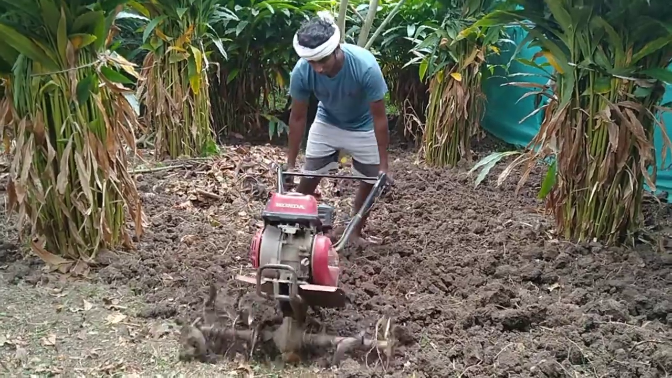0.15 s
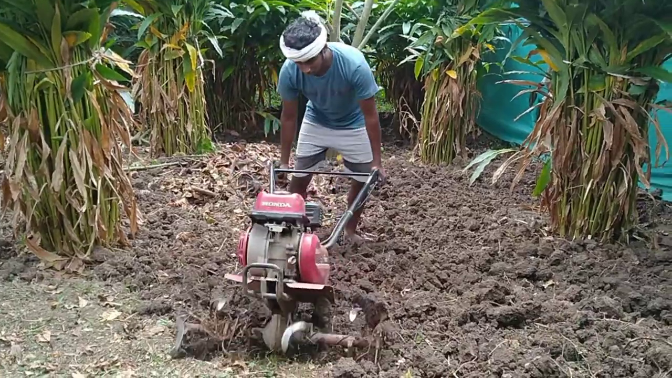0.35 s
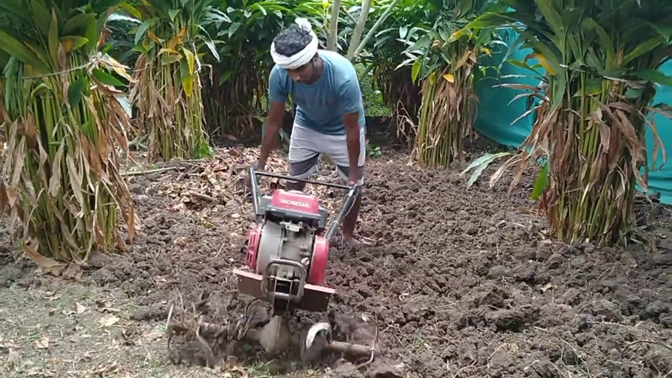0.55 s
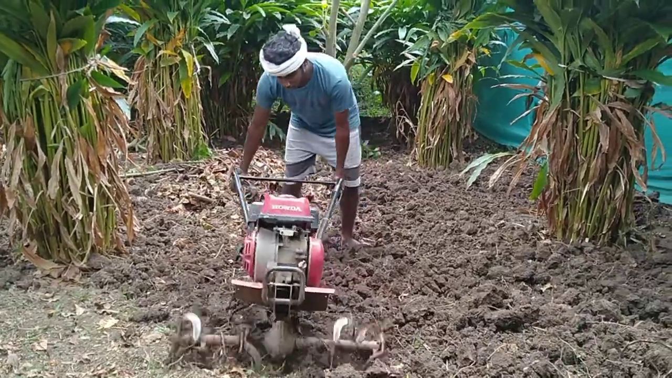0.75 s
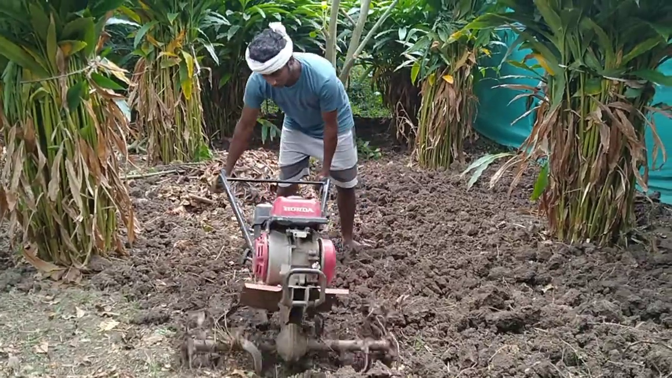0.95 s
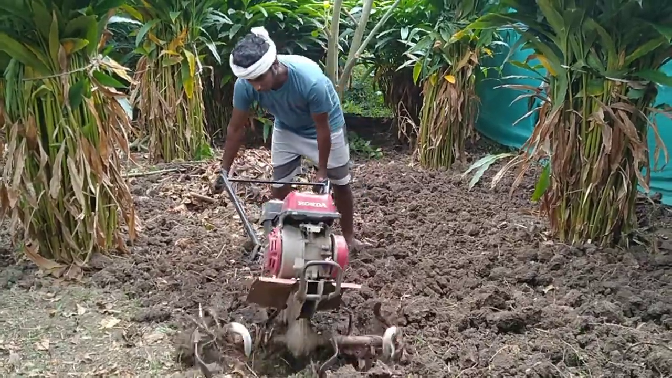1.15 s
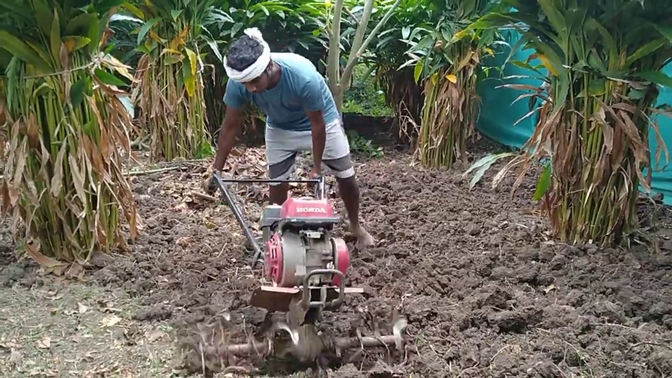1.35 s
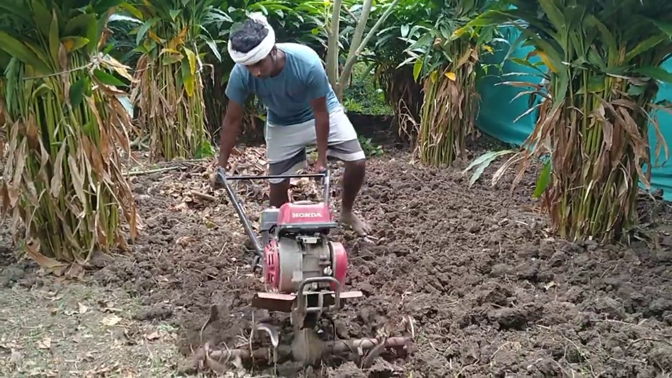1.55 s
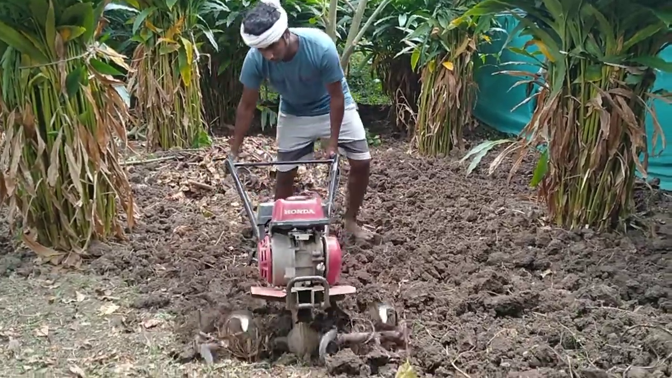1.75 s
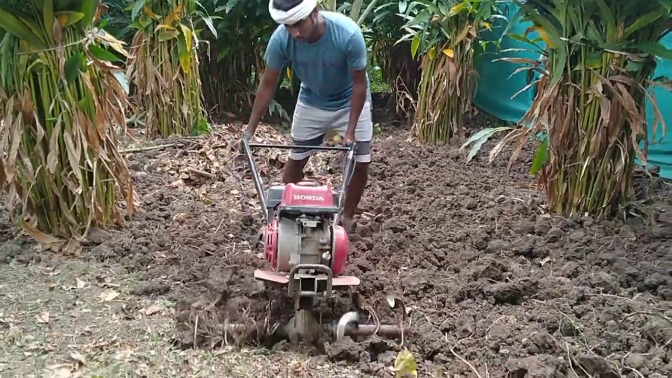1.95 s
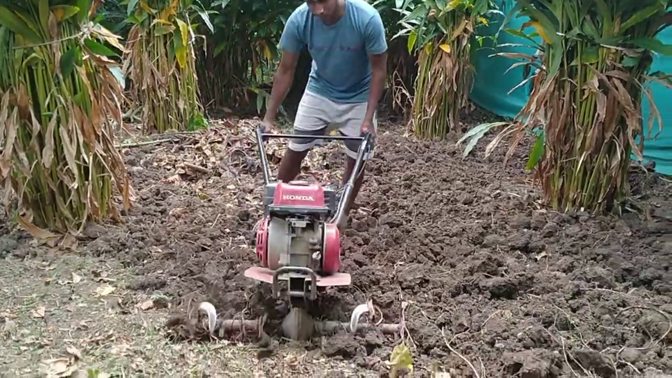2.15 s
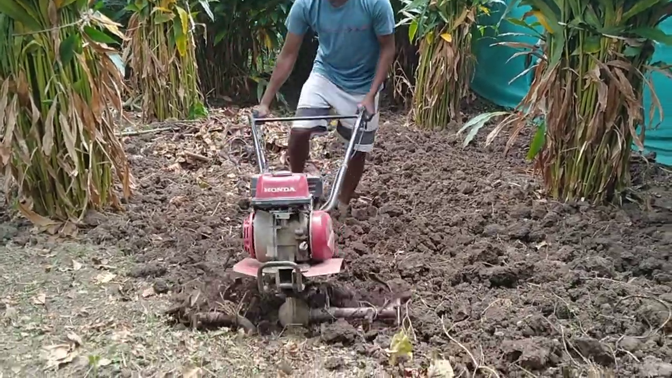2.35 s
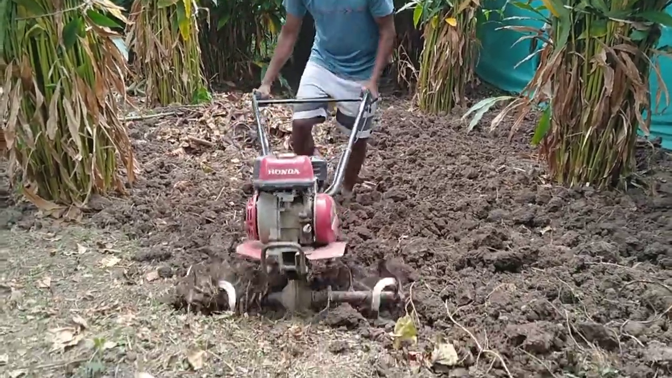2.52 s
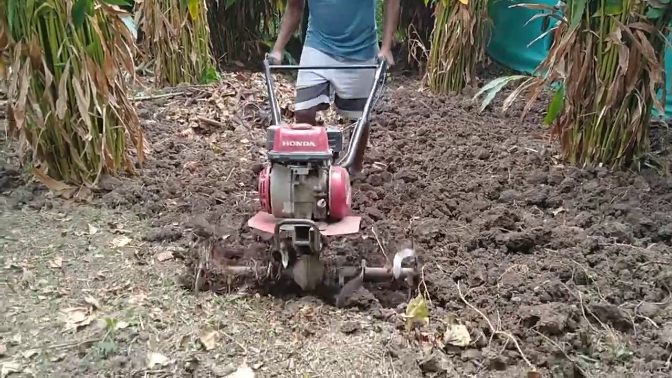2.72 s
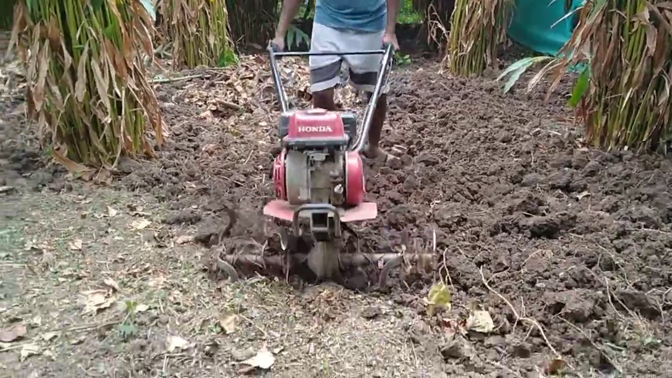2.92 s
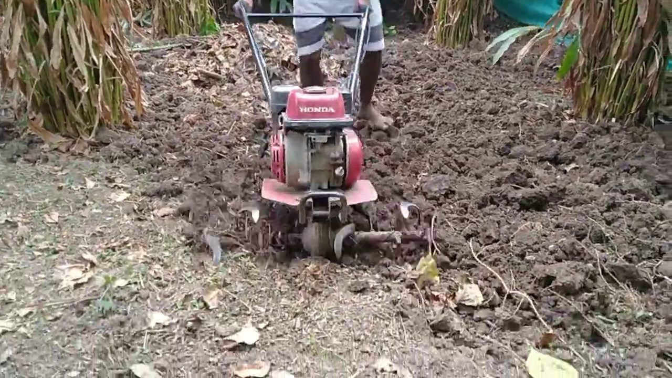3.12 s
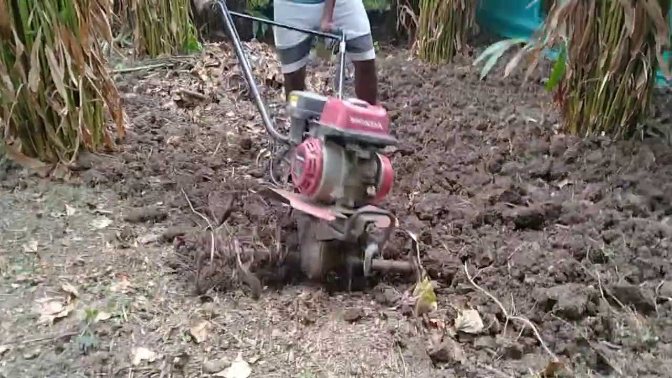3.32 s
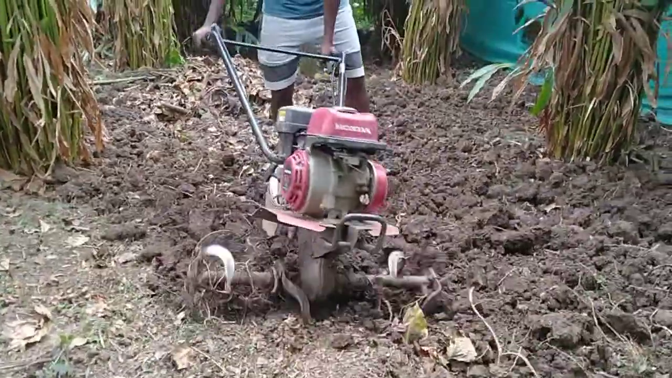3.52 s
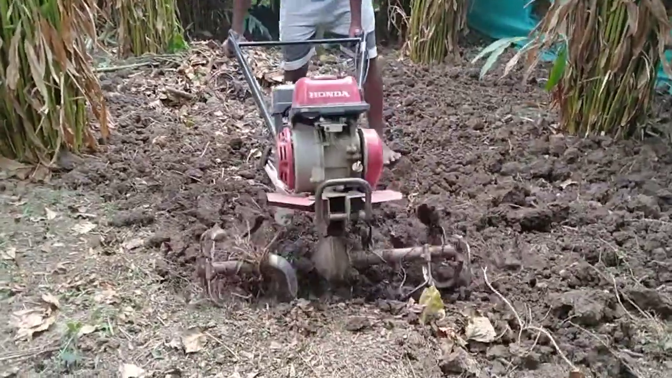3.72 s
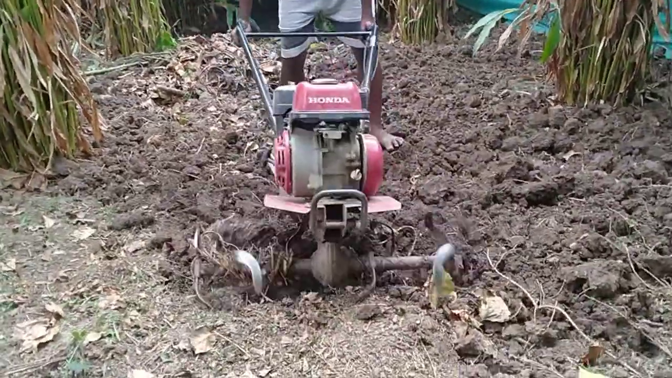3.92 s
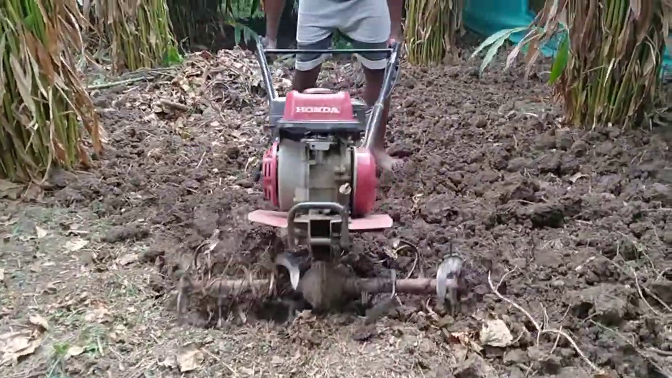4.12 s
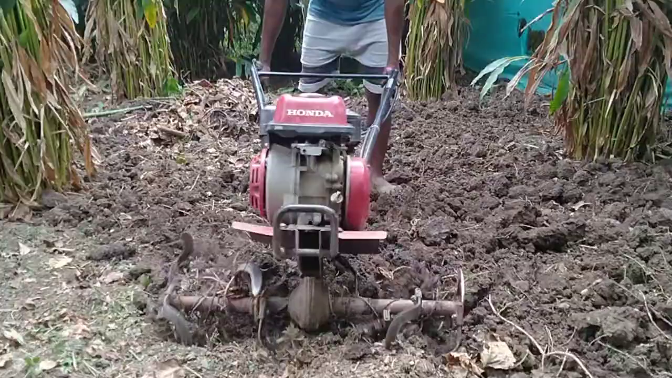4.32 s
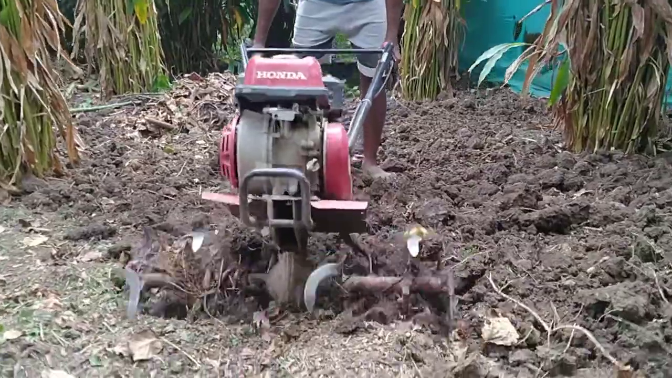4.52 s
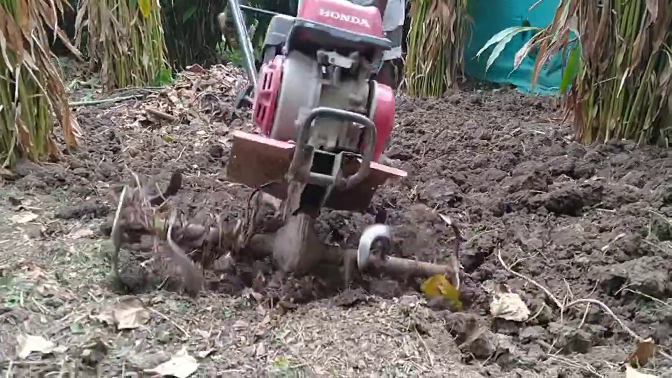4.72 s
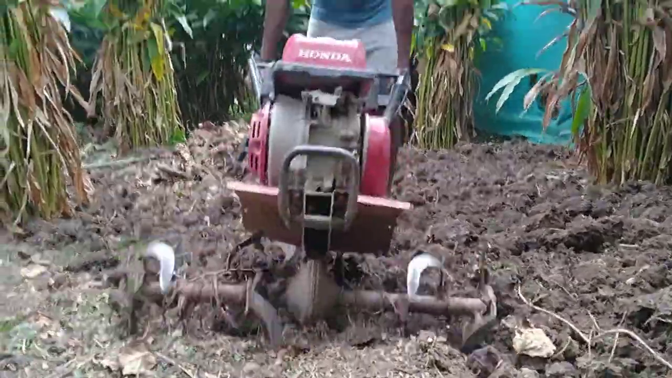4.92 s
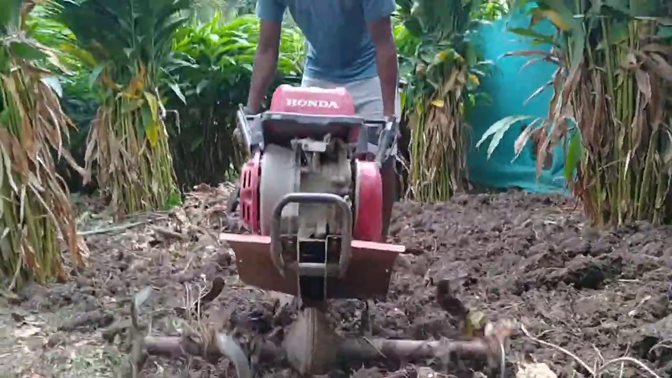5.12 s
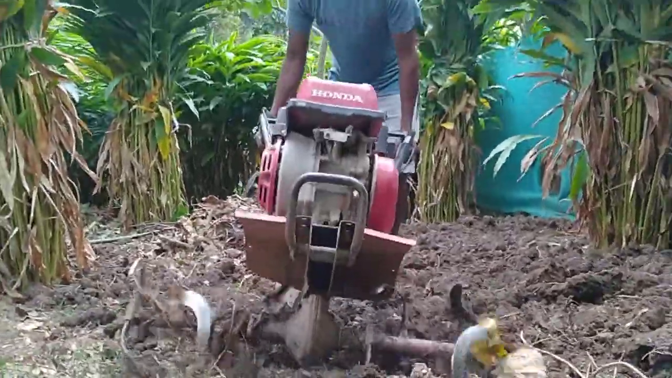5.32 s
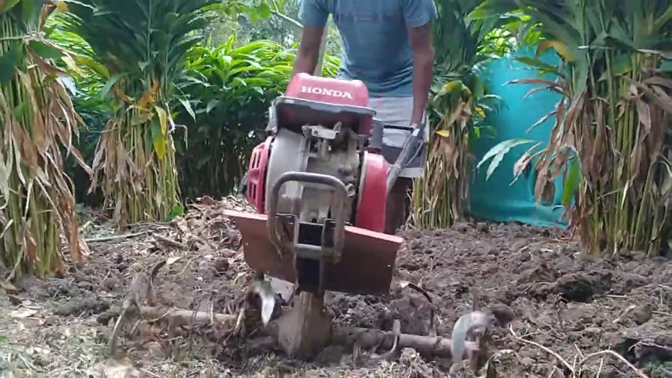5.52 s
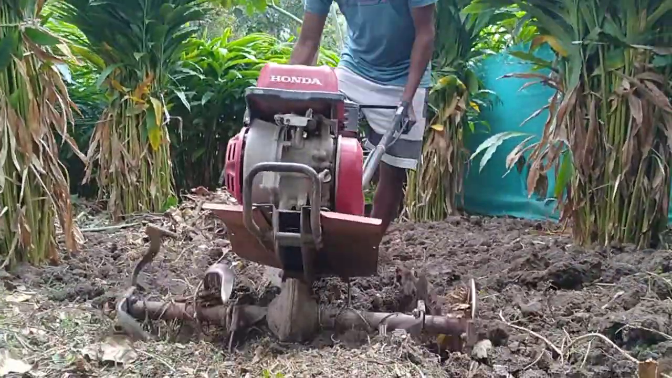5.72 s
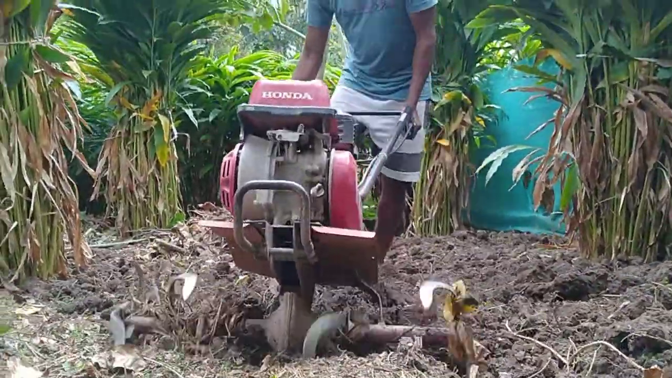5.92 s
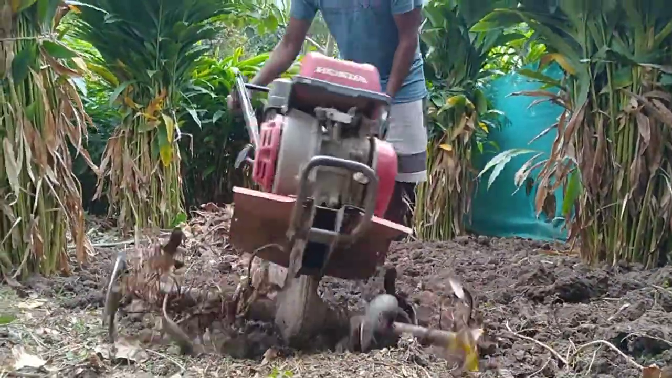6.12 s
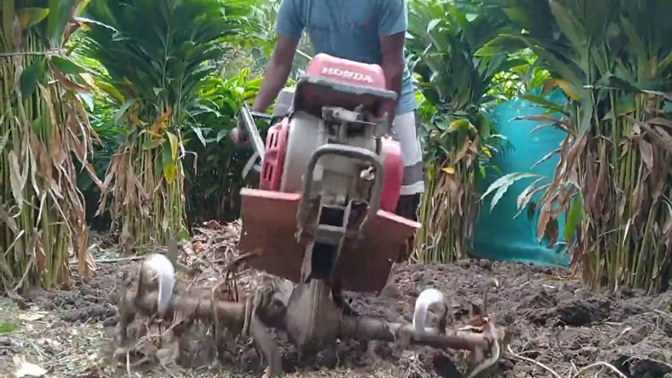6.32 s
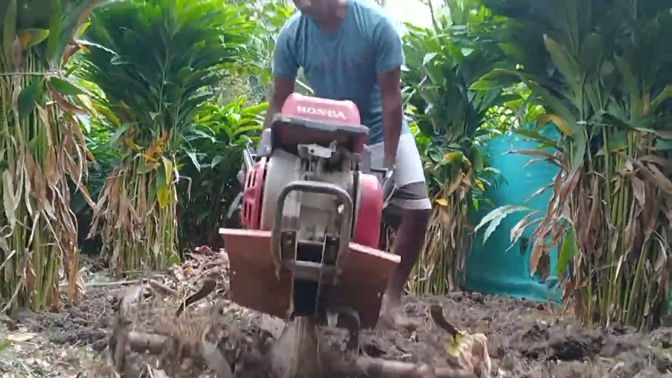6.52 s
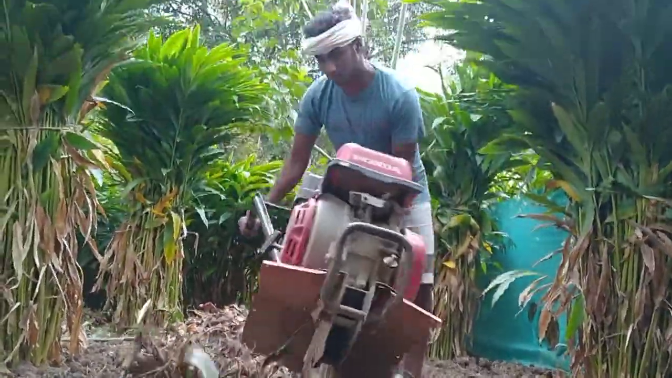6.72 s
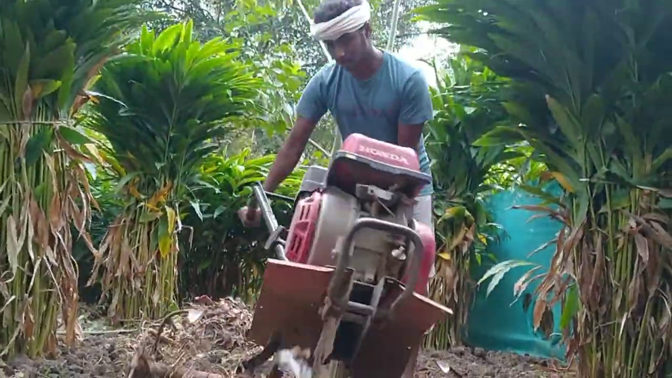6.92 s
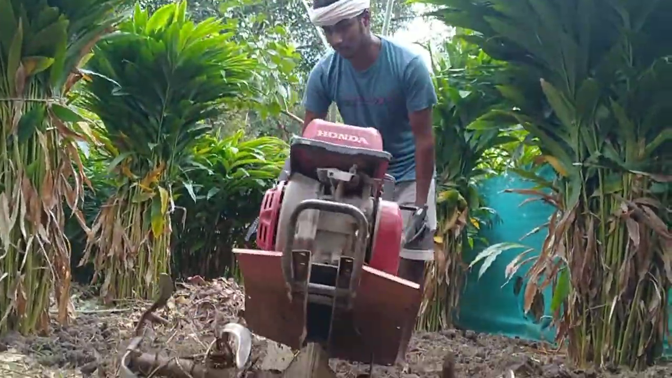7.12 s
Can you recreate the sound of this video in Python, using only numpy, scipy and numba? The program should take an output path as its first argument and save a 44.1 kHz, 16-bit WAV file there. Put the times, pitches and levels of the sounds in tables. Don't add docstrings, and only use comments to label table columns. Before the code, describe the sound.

A small petrol tiller engine chugs hard outdoors, coming slowly closer, with rapid exhaust thuds, loose metal rattle and tines scraping through dry soil.

```python
import sys
import numpy as np
from scipy import signal
from scipy.io import wavfile
from scipy.ndimage import uniform_filter1d
from numba import njit

SR = 44100
rng = np.random.default_rng(int(sys.argv[2]) if len(sys.argv) > 2 else 0)


def volts_from_decibels(level):
    exponent = np.asarray(level, float) / 20
    return 10 ** exponent


def file_out(sig):
    cols = np.atleast_2d(sig).T
    lim = np.clip(cols, -1, 1)
    pcm = np.round(lim * 32767).astype(np.int16)
    wavfile.write(sys.argv[1], SR, pcm)


N = 315315
VALVE_MS, BANG_MS, KNOCK_MS, JET_MS = -2.9, 7.18, 16.94, 6.3

# frequency in Hz, level in dB per Hz.
CASING_SPECTRUM = [(120, -29), (200, -3), (402, -6), (540, -10.5), (824, -7.5), (1850, -9.5), (2220, -11.5),
                   (2390, -8), (6460, -37), (7910, -41.5), (9160, -83), (14500, -19), (16200, -29)]
# time in s, nearness in dB, exhaust turned this way in dB,
# frame shake in dB, silencer drone in dB, fins turned this way in dB.
APPROACH = [(0.0, -35.5, -1.5, -4.5, 6, 0), (0.1, -36.5, -1, -5, -9, -3), (0.3, -34, -3.5, -5, -9, -1.2),
            (1.25, -32, -3, -6, -11, -2), (1.6, -32, -2, -7, -7, -1), (2.2, -32, -2, -5, -9, -3),
            (3.1, -31, -1.5, -4, -3, -1), (3.9, -30, -1, -4.5, -3, -1.5), (4.4, -28.5, -3.5, -5, -8, 0.1),
            (4.7, -27.5, -3, -6, -7.5, -0.2), (5.3, -26.5, -4, -6.5, -7.5, -2.5),
            (5.5, -26.5, -2, -7, -7, -2), (6.01, -26.5, -0.2, -5.5, -8, -2.5),
            (6.07, -25.5, -2.5, -8.5, -6, -0.2), (6.4, -26.5, -4, -7, -5, 1),
            (6.7, -26.5, -4.5, -6.5, -6.5, 2.1), (7.15, -25.5, -4.5, -10, -3, 2.5)]
# time in s, half length in s, swell in dB.
SCRAPES = [(0.61, .05, -1), (2.73, 0.022, 1), (2.87, 0.036, 0.5), (3.2, 0.038, 1.5), (3.4, 0.046, 1.5),
           (3.73, 0.027, 1.5), (3.9, .05, 1.5), (4.5, 0.055, 1), (4.65, 0.02, 6), (4.73, 0.037, 4.5),
           (5.82, .04, 1), (6.21, .04, 1.5), (6.5, 0.084, 3), (6.91, 0.024, 0), (7.05, .04, 1.5)]


def rms_one(x):
    return x / np.sqrt(np.mean(x ** 2) + 1e-20)


def in_time(rows):
    s, *columns = np.transpose(rows)
    return [np.interp(np.arange(N) / SR, s, c) for c in columns]


def humps(rows):
    t = np.arange(0, N + 100, 100) / SR
    swells = sum(size * np.exp(-((t - s) / half_s) ** 2) for s, half_s, size in rows)
    return np.interp(np.arange(N) / SR, t, swells)


def band(x, low_hz, high_hz):
    return signal.sosfilt(signal.butter(2, [low_hz, min(high_hz, .45 * SR)], "band", fs=SR, output="sos"), x)


def drift(rate_hz):
    r = np.exp(-80 * np.pi * rate_hz / SR)
    slow = signal.lfilter([1], [1, -2 * r, r * r], rng.standard_normal(N // 40 + 2002))[2000:]
    return np.interp(np.arange(N) / 40, np.arange(len(slow)), rms_one(slow))


def ring(clicks, hz, t60_s):
    r, w = volts_from_decibels(-60 / (t60_s * SR)), 2 * np.pi * hz / SR
    return signal.lfilter([0, np.sin(w)], [1, -2 * r * np.cos(w), r * r], clicks + 1e-18)


def resonance(x, hz, width_hz):
    r = np.exp(-np.pi * width_hz / SR)
    poles = [1, -2 * r * np.cos(2 * np.pi * hz / SR), r * r]
    return signal.lfilter(np.array([1, 0, -1]) * (1 - r * r) / 2, poles, x)


@njit
def sliding(x, hz, width_hz, rate):
    out, r = np.zeros(len(x)), np.exp(-np.pi * width_hz / rate)
    for i in range(2, len(x)):
        drive = (1 - r * r) / 2 * (x[i] - x[i - 2])
        out[i] = drive + 2 * r * np.cos(2 * np.pi * hz[i] / rate) * out[i - 1] - r * r * out[i - 2]
    return out


def coloured(spectrum, low_hz, high_hz, patchy_db, gate, count=3):
    hz, level_db = np.transpose(spectrum)
    edges = np.geomspace(low_hz, high_hz, round(count * np.log2(high_hz / low_hz)) + 1)
    white, out = rng.standard_normal((2, N)), 0
    for k, (low, high) in enumerate(zip(edges, edges[1:])):
        band_db = np.interp(np.log(low * high) / 2, np.log(hz), level_db)
        out = out + volts_from_decibels(band_db + patchy_db * drift(1.2)) * band(white[k % 2], low, high)
    return rms_one(out * gate)


def clicks_at(s, sizes):
    at, out = np.round(s * SR).astype(int), np.zeros(N)
    out[at[at < N]] = sizes[at < N]
    return out


def stroke(fired, ms, modes, spread_db):
    stage_s = [1.8, 3.6, 4.8]
    strength = volts_from_decibels(spread_db * rng.standard_normal(len(fired)))
    out = 0
    for hz, t60_ms, *heights in modes:
        clicks = clicks_at(fired + ms / 1000, strength * np.interp(fired, stage_s, heights))
        out = out + ring(clicks, hz, t60_ms / 1000)
    return out


def puffs(fired, ms, decay_ms, spread_db, rise_ms=0.097):
    clicks = clicks_at(fired + ms / 1000, volts_from_decibels(spread_db * rng.standard_normal(len(fired))))
    fall = signal.lfilter([1], [1, -np.exp(-1000 / (decay_ms * SR))], clicks)
    rise = np.exp(-1000 / (rise_ms * SR))
    return signal.lfilter([1 - rise], [1, -rise], fall)


def sag():
    # time in s, sag in firings per s, half length in s.
    bites = [(0.077, 1.11, 0.102), (0.29, 1.48, 0.084), (0.617, 2.58, 0.137), (1.06, 1.72, 0.155),
             (1.219, 2.01, 0.078), (1.386, 1.98, 0.096), (1.616, 1.73, 0.17), (1.933, 2.85, 0.088),
             (2.09, 2.34, 0.076), (2.285, 1.89, 0.152), (2.631, 2.49, 0.129), (2.982, 2.19, 0.095),
             (3.281, 3.12, 0.064), (3.486, 1.89, 0.116), (3.731, 2.16, 0.063), (4.054, 1.98, 0.151),
             (4.334, 1.66, 0.17), (4.671, 2.78, 0.11), (4.858, 1.08, 0.074), (5.073, 1.13, 0.17),
             (5.36, 2.44, 0.095), (5.529, 1.62, 0.084), (5.75, 1.19, 0.17), (6.075, 2.59, 0.103),
             (6.253, 1.48, 0.069), (6.516, 2.41, 0.063), (6.742, 2.58, 0.1), (6.953, 2.98, 0.068),
             (7.08, 1.6, 0.075)]
    return humps([(s, half_s, lost) for s, lost, half_s in bites])


def firings():
    free_firings_per_s, first_turn, pause_s, pause_turn = 31.6, -.7477, 4.4, .2816
    t = np.arange(N) / SR
    turns = first_turn + np.cumsum(free_firings_per_s - sag()) / SR
    turns = turns - pause_turn * np.clip((t - pause_s) / .012, 0, 1)
    return np.interp(np.arange(int(turns[-1]) + 1), turns, t)


def pressure_pulses(fired):
    # frequency in Hz, t60 in ms, signed height far, midway, near.
    thump_modes = [(199, 45, 3.67, 3.58, 3.73), (57, 94.7, -1.42, -1.45, -1.42), (441, 75, .1, .75, .5),
                   (980, 6.1, -.59, -2.44, -1.6), (683, 7.6, 3.01, 3.34, .74)]
    bang_modes = [(478, 12.5, .36, -.13, -2.66), (605, 30.8, -.3, -.85, 1.15), (177, 140, -.36, -.35, -.2),
                  (285, 140, .26, .31, .56), (550, 48, -1.4, -1.0, -.25)]
    knock_modes = [(104, 140, -.37, -.43, -.47), (137, 20.8, 2.05, 2.3, 2.33),
                   (274, 63.9, -.61, -.46, -.66)]
    thump = stroke(fired, -1.27, thump_modes, spread_db=.5)
    bang = stroke(fired, BANG_MS, bang_modes, spread_db=.9)
    knock = stroke(fired, KNOCK_MS, knock_modes, spread_db=.9)
    pulses = signal.sosfilt(signal.butter(2, 2500, fs=SR, output="sos"), thump + bang + knock)
    deep = signal.sosfiltfilt(signal.butter(2, 140, fs=SR, output="sos"), pulses)
    load_db = sag() - 1.0
    return volts_from_decibels(in_time(APPROACH)[0]) * (pulses + (volts_from_decibels(load_db) - 1) * deep)


def silencer_drone(fired):
    near_db, _, _, drone_db, _ = in_time(APPROACH)
    swell = 1 + 1.4 * puffs(fired, BANG_MS, decay_ms=5.3, spread_db=3, rise_ms=1.5)
    return volts_from_decibels(near_db + drone_db - 6.0) * coloured(CASING_SPECTRUM, 253, 709, patchy_db=-0.5, gate=swell)


def exhaust_jet(fired):
    # frequency in Hz, level in dB per Hz.
    jet_spectrum = [(5290, -39), (9000, -13), (10100, -2.5), (12700, 0), (14600, 4), (15100, 0),
                    (15700, -9)]
    # frequency in Hz, width in Hz, level in dB.
    shell_modes = [(10800, 250, -19), (11400, 250, -21), (12300, 250, -11), (13000, 250, -13),
                   (13700, 300, -14), (14500, 350, -8), (15300, 400, -9)]
    near_db, turn_db, *_ = in_time(APPROACH)
    lower_db = -32.5 + 0.33 * near_db + 0.018 * turn_db + 1.1 * humps(SCRAPES)

    blast = puffs(fired, JET_MS, decay_ms=10, spread_db=2.0)
    leak = .25 * puffs(fired, KNOCK_MS + 2.8, decay_ms=3, spread_db=4)
    gas = 0.27 + blast + leak
    jet = coloured(jet_spectrum, 11800, 16400, patchy_db=1.2, gate=gas, count=9)

    blows = rng.standard_normal(N) * puffs(fired, JET_MS, decay_ms=8.4, spread_db=1.5)
    shell = 0
    for hz, width_hz, db in shell_modes:
        shell = shell + volts_from_decibels(db + 2.5 * drift(1.5)) * rms_one(resonance(blows, hz, width_hz))

    lower = volts_from_decibels(lower_db) * coloured(jet_spectrum, 9370, 12000, patchy_db=3.5, gate=gas + 0.55, count=9)
    front = rng.standard_normal(N) * puffs(fired, JET_MS, decay_ms=0.6, spread_db=1.5, rise_ms=0.05)
    crack = volts_from_decibels(-1.5 + 2.5 * turn_db) * rms_one(band(front, 14000, 16000))
    return volts_from_decibels(near_db + turn_db - 4.5) * (jet + shell + crack) + lower


def casing(fired, shake, grit, housing_db, gears_db, fins_db):
    # frequency in Hz, width in Hz, level in dB.
    panels = [(781, 44, -10.5), (1555, 76, -13), (2084, 44, -15.5), (2950, 98, -16), (3174, 50, -17),
              (3632, 140, -11.5), (4094, 230, -11), (6460, 28, -25)]
    pattern = grit[:1450] * (1 + 0.53 * shake[round(fired[9] * SR):][:1450])
    cycles = clicks_at(fired, volts_from_decibels(1.5 * rng.standard_normal(len(fired))))
    contacts = signal.fftconvolve(cycles, pattern)[:N]
    parts = (
        (697, 1667, housing_db - 3.0, 0.44),
        (1720, 4740, gears_db + 2.5, 0.74),
        (5630, 8100, fins_db - 4.0, 0.99))
    out = 0
    for low_hz, high_hz, level_db, depth in parts:
        gate = 1 + depth * shake
        body = coloured(CASING_SPECTRUM, low_hz, high_hz, patchy_db=1.1, gate=gate, count=4)
        for hz, width_hz, panel_db in panels:
            if low_hz <= hz < high_hz:
                wander_db = 1.5 * drift(3)
                body = body + volts_from_decibels(panel_db + wander_db) * rms_one(resonance(grit * gate, hz, width_hz))
        body = rms_one(body) + volts_from_decibels(-2.5) * rms_one(band(contacts, low_hz, high_hz))
        out = out + volts_from_decibels(level_db) * rms_one(body)
    return out


def cooling_fins(shake, hiss, fins_db):
    fins_hz, width_hz = 7950, 970
    fins = resonance(resonance(hiss * (1 + 1.27 * shake), fins_hz, width_hz), fins_hz, width_hz * 2)
    return volts_from_decibels(fins_db - 2.5) * rms_one(fins)


def hollow_parts(fired, shake, grit, hiss, near_db):
    # time in s, housing in Hz, housing open in dB, tank in Hz, tank open in dB, against nearness.
    hollow_curves = [(0.0, 1210, -5.5, 2405, -18), (0.5, 1210, -3, 2400, -5.5), (1.2, 1224, -4, 2420, -4),
                     (1.95, 1225, -1, 2400, -6), (2.2, 1294, -2, 2400, -15), (2.9, 1246, -3.5, 2300, -8),
                     (3.1, 1230, -5.5, 2500, -13), (3.9, 1370, -6.5, 2480, -11), (4.3, 1310, -7, 2440, -7),
                     (4.5, 1110, 0, 2440, -4.5), (4.71, 1200, 0.5, 2400, -12), (4.9, 1234, -3, 2410, -14),
                     (5.2, 1430, -2, 2490, -4), (5.5, 1320, -7, 2350, -9), (5.95, 1330, -9, 2500, -16),
                     (6.4, 1295, -9, 2410, -9.5), (6.7, 1250, -9.5, 2380, -9), (7.15, 1285, -7.5, 2360, -6)]
    boom_hz, boom_db, tank_hz, tank_db = in_time(hollow_curves)
    boom = sliding(grit * (1 + 0.17 * shake), boom_hz, 320.0, SR)
    thin_wall = sliding(hiss, boom_hz, 45., SR)
    boom = rms_one(boom) + volts_from_decibels(-3.5) * rms_one(thin_wall)

    slap = puffs(fired, BANG_MS + 2.5, decay_ms=1.8, spread_db=1.5, rise_ms=1.2)
    tap = clicks_at(fired + (BANG_MS + 3.2) / 1000, 13 * volts_from_decibels(2.0 * rng.standard_normal(len(fired))))
    struck = hiss[::-1] * (.12 + .3 * slap) + tap
    tank = sliding(sliding(struck, tank_hz, 110., SR), tank_hz, 130., SR)
    return volts_from_decibels(near_db + boom_db - 2.0) * rms_one(boom) + volts_from_decibels(near_db + tank_db - 5.0) * rms_one(tank)


def guard_plate(hiss, shake_db):
    # time in s, half length in s, level in dB over rest.
    rubs = [(0.61, 0.051, 17), (1.1, 0.2, 9.5), (1.4, 0.13, 12.5), (1.65, 0.12, 12.5), (1.88, .04, 12),
            (2.03, 0.072, 13), (2.27, .06, 11), (2.67, .04, 9), (2.97, 0.089, 14), (3.25, .05, 8),
            (3.48, .03, 6), (3.7, .03, 7), (4.05, 0.13, 10.5), (4.3, .1, 8), (4.45, 0.044, 7),
            (4.68, .05, 8), (4.95, 0.17, 8), (5.3, .06, 9), (5.47, 0.09, 12), (6.05, 0.077, 8),
            (6.21, 0.082, 10.5), (6.5, .06, 0), (6.67, 0.066, 11.5), (6.91, .04, 15), (7.07, .04, 4)]
    guard_hz, width_hz, rest_db = 1842, 30, -13
    guard = resonance(resonance(hiss, guard_hz, width_hz), guard_hz, width_hz * 2)
    guard = guard / np.sqrt(uniform_filter1d(guard ** 2, size=3000) + 1e-9)
    return volts_from_decibels(shake_db + rest_db + humps(rubs) + 1.5) * guard


def rattle(fired):
    near_db, _, frame_db, _, fins_turn_db = in_time(APPROACH)
    shake_db = near_db + frame_db
    scraped_db = shake_db + humps(SCRAPES)
    housing_db = scraped_db + 1.5 - 0.17 * (near_db - near_db.mean())
    gears_db = scraped_db - 0.26
    fins_db = scraped_db + 1.5 + 0.13 * near_db + fins_turn_db

    shake = puffs(fired, JET_MS, decay_ms=6.0, spread_db=2.5)
    shake = shake + .4 * puffs(fired, KNOCK_MS + 2.8, decay_ms=2.5, spread_db=4.0)
    grit_size = volts_from_decibels(3.2 * np.minimum(rng.exponential(1, N), 4))
    grit = grit_size * (rng.random(N) < 9000 / SR) * rng.choice([-1, 1], N)
    hiss = rng.standard_normal(N)
    out = casing(fired, shake, grit, housing_db, gears_db, fins_db)
    out = out + cooling_fins(shake, hiss, fins_db)
    out = out + hollow_parts(fired, shake, grit, hiss, near_db)
    return out + guard_plate(hiss, shake_db)


def ticks(fired):
    # delay after firing in ms, low edge in Hz, high edge in Hz, level in dB against the shake.
    contact_bands = [
        (VALVE_MS, 4400, 22000, -16.5),
        (VALVE_MS, 1500, 3900, -18),
        (-1.5, 700, 1500, -10.5),
        (JET_MS, 1200, 3450, -10),
    ]
    near_db, _, frame_db, *_ = in_time(APPROACH)
    hiss, out = rng.standard_normal(N), 0
    for ms, low_hz, high_hz, db in contact_bands:
        contact = hiss * puffs(fired, ms, decay_ms=1.06, spread_db=4.5)
        out = out + volts_from_decibels(db) * rms_one(band(contact, low_hz, high_hz))
    return volts_from_decibels(near_db + frame_db) * out


def whine(fired):
    # multiple of the firing rate, level in dB against nearness, time in s, half length in s.
    crank_tones = [(14, -20, 3.8, .6), (15, -20, 3.7, .8), (18, -19, 2.8, 2.2), (21, -16, 3.25, .4)]
    turns = np.interp(np.arange(N) / SR, fired, np.arange(len(fired)))
    tones = 0
    for multiple, db, s, half_s in crank_tones:
        tones = tones - volts_from_decibels(db) * humps([(s, half_s, 1)]) * np.cos(2 * np.pi * multiple * turns)
    return volts_from_decibels(in_time(APPROACH)[0]) * tones * (turns > 0)


def tines():
    # time in s, peak in dB.
    thuds = [
        (6.475, -19),
        (6.9, -21),
    ]
    # time in s, peak in dB, frequency in Hz.
    stones = [(0.1287, -32, 10300), (3.8227, -32, 10200), (4.1859, -31, 7450), (4.4633, -33, 7980),
              (4.733, -31, 7940), (4.8978, -36, 4310), (5.6271, -35, 4190), (6.3525, -31, 7950),
              (6.4622, -26, 7940), (6.5819, -34, 7650), (6.75, -33, 8000), (6.917, -30, 7640),
              (7.0204, -26, 7940), (7.1202, -25, 8310)]
    s, peak_db = np.transpose(thuds)
    out = ring(clicks_at(s, volts_from_decibels(peak_db)), hz=115, t60_s=0.12)
    for s, peak_db, hz in stones:
        at = round(s * SR)
        tick = rng.standard_normal(700) * np.exp(-np.arange(700) / (0.0078 * SR))
        out[at:at + 700] += (volts_from_decibels(peak_db + 3.5) * band(tick, hz / 1.4, hz * 1.4))[:N - at]
    return out


def cavities(fired):
    # time in s, half length in s, frequency in Hz, level in dB against nearness, lag in ms.
    hollows_below = [(3.2, 0.27, 590, -16, 0.81), (4.28, 0.26, 765, -10, 0.1), (3.9, 0.2, 535, -18, 0.7),
                     (6.63, 0.56, 568, -16, 1), (6.13, 0.59, 450, -20, 0.77)]
    sizes, out = volts_from_decibels(1.8 * rng.standard_normal(len(fired))), 0
    for s, half_s, hz, db, lag_ms in hollows_below:
        rung = ring(clicks_at(fired + (BANG_MS + lag_ms) / 1000, sizes), hz, t60_s=0.044)
        out = out + volts_from_decibels(db) * humps([(s, half_s, 1)]) * rms_one(rung)
    return volts_from_decibels(in_time(APPROACH)[0]) * out


def scene():
    # time in s, cancelled frequency in Hz, depth from 0 to 1.
    ground_dip = [(0, 440, 1), (1.5, 386, 0.9), (2.5, 416, 0.17), (3.5, 328, 0.93), (4.3, 320, 0.8),
                  (4.6, 316, 0), (7.15, 290, 0)]
    fired = firings()
    pulses = pressure_pulses(fired)
    noise = silencer_drone(fired) + exhaust_jet(fired) + rattle(fired) + ticks(fired) + cavities(fired)
    dip_hz, depth = in_time(ground_dip)
    cancelled = np.clip(depth, 0, 1) * sliding(noise, dip_hz, 210.0, SR)
    near = pulses + whine(fired) + tines() + noise - cancelled
    echo = signal.lfilter([.3], [1, -.7], np.roll(near, round(0.061 * SR)))
    return (near + volts_from_decibels(-28) * echo)[None]


def band_limit(x):
    return signal.sosfilt(signal.butter(12, 16810, fs=SR, output="sos"), x)


def record(dry):
    cut = signal.sosfilt(signal.ellip(10, .5, 60, 15720, fs=SR, output="sos"), dry)
    return band_limit(cut)


dry = scene()
out = record(dry)
file_out(out)
```